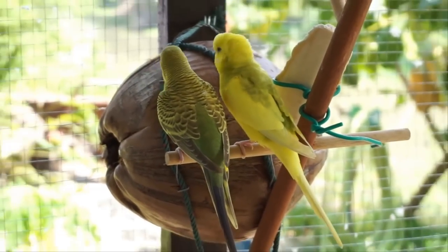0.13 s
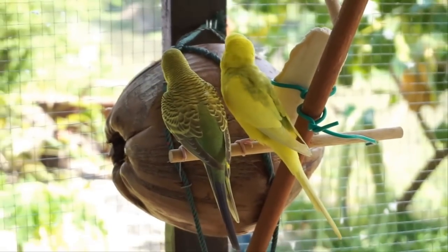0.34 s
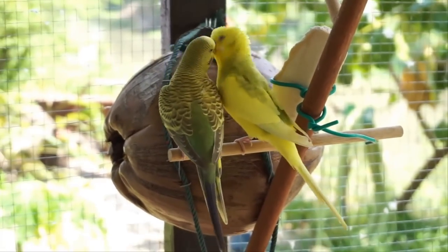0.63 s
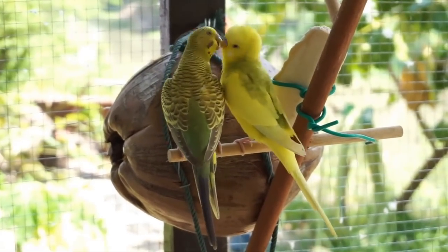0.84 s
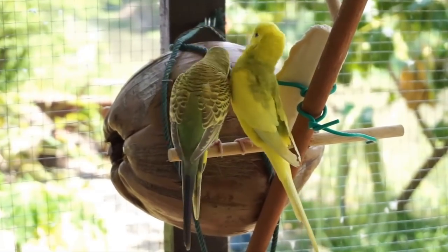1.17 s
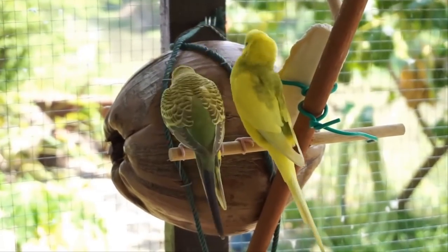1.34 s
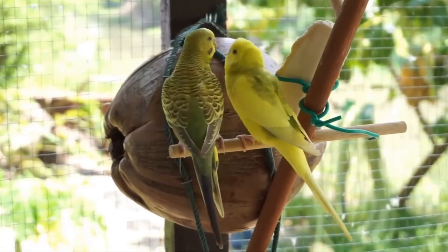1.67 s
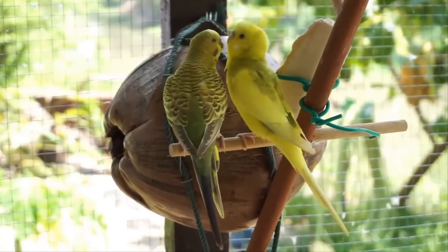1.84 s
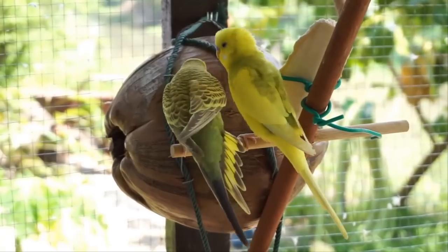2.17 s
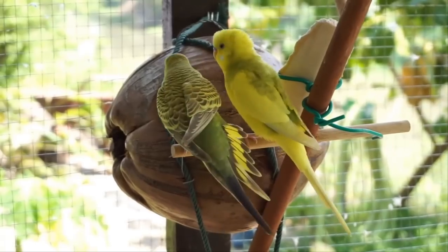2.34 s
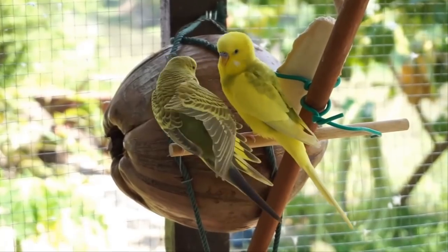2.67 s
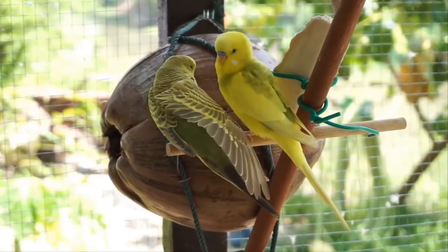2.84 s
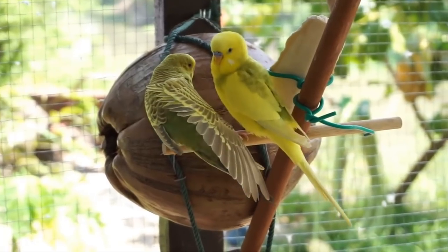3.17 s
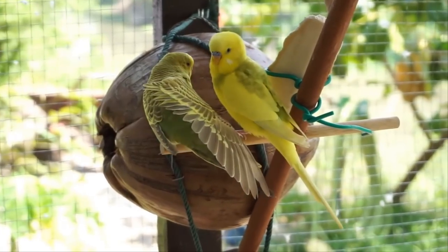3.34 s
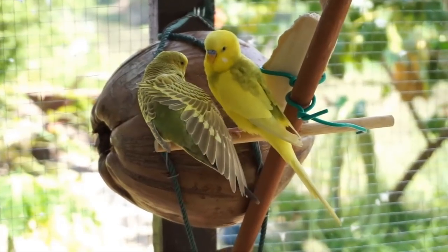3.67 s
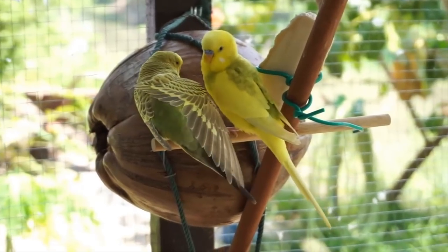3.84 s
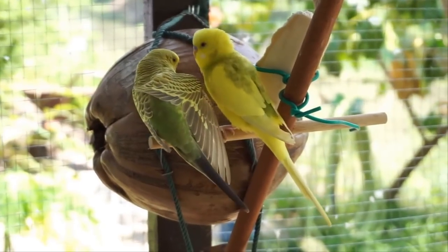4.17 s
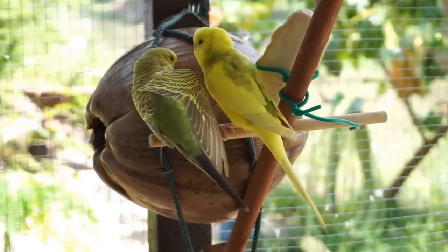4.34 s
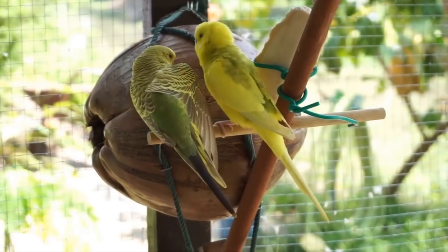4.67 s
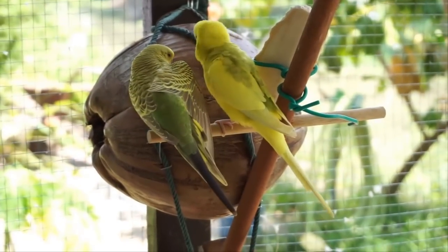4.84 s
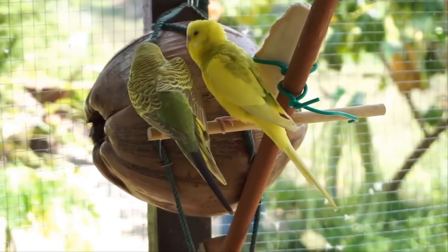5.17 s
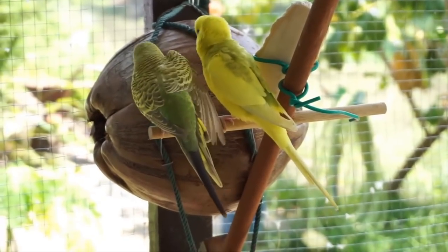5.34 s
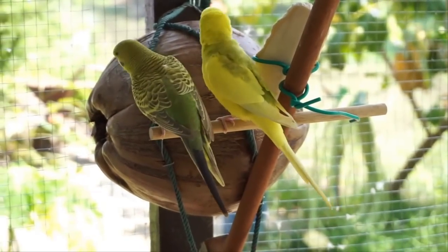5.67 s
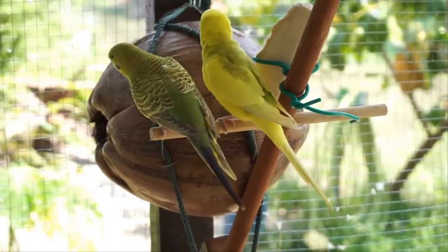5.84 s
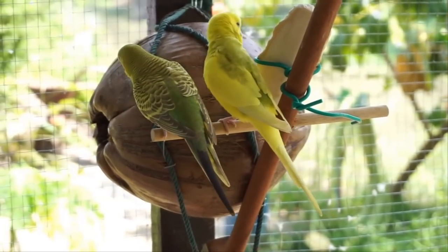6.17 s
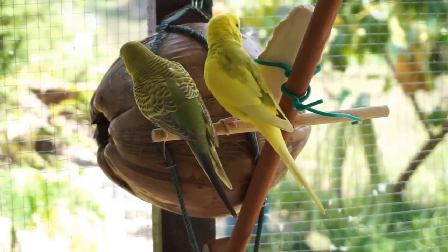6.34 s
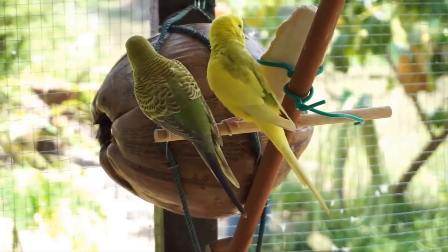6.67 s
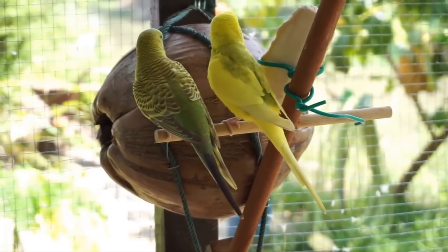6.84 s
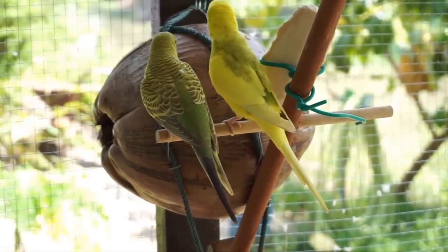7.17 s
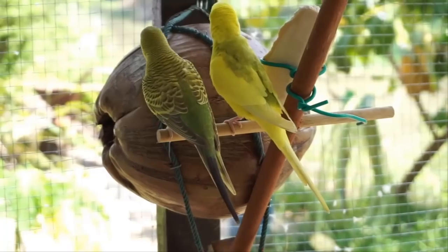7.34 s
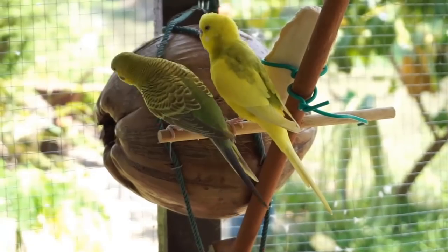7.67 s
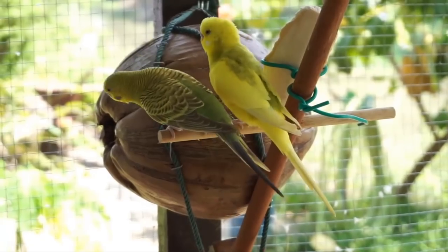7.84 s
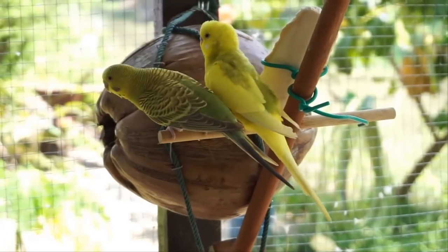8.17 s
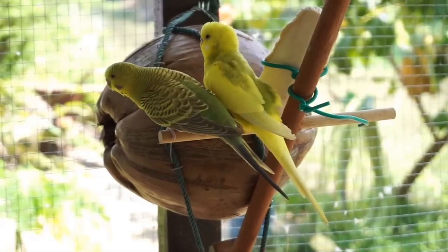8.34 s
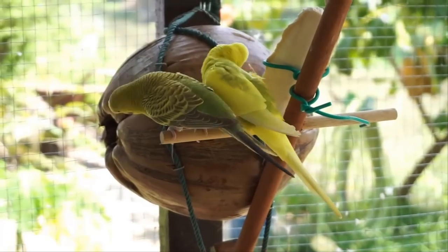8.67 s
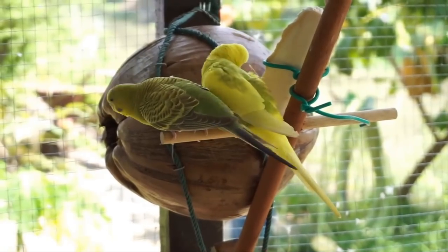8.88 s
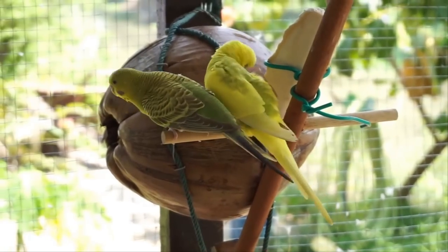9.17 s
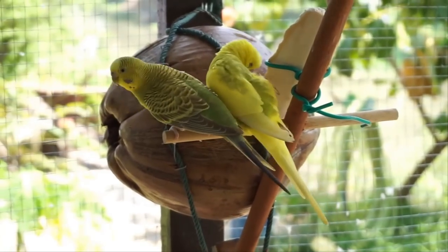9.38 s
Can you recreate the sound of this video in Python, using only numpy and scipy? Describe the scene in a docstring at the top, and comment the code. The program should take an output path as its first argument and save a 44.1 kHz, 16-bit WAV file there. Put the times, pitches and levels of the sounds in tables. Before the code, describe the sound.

In an outdoor aviary, small parrots warble continuously near the microphone and somewhat to its right, mixing quick gliding chirps, scratchy squawks and beak clicks with a slight, short echo. A faint far engine hums beneath the open air throughout. A soft low rustle passes once about two thirds through, then the flock eases a little and a faraway songbird gives five high falling chirps.

```python
"""An open aviary, where a flock of budgerigars warbles, mostly from the right. The syrinx whistles gliding
notes or vibrates roughly in squawks; squawks and tongue clicks resonate in chest, throat and beak.
Roof, posts and nest shells return short echoes. Farther birds chatter, and near the end a songbird
repeats a falling chirp. A far engine hums under outdoor air, and a low rustle passes once."""
import sys
import numpy as np
from scipy import signal
from scipy.fft import rfft, irfft, next_fast_len
from scipy.io import wavfile
from scipy.ndimage import uniform_filter1d, map_coordinates

SR = 44100
rng = np.random.default_rng(int(sys.argv[2]) if len(sys.argv) > 2 else 0)


def master_out(mix):
    """Clip the mix to full scale and print it as 16-bit PCM to the path in sys.argv[1]."""
    frames = np.transpose(np.atleast_2d(mix))
    ceiling = np.clip(frames, -1, 1)
    pcm = np.round(ceiling * 32767).astype(np.int16)
    wavfile.write(sys.argv[1], SR, pcm)


N = 419391


def amp(db):
    return 10 ** (np.asarray(db) / 20)


def unit_rms(x):
    return x / np.sqrt(np.mean(x ** 2) + 1e-20)


def log_interp(points, hz):
    """Interpolate (Hz, value) points on a log axis."""
    f, values = np.transpose(points)
    return np.interp(np.log(hz + 1), np.log(f + 1), values)


def wobble(rate_hz, size=N):
    """Smooth random curve, rate_hz knots a second."""
    knots = rng.standard_normal(int(size * rate_hz / SR) + 4)
    return map_coordinates(knots, [np.arange(size) * rate_hz / SR])


def phase_of(hz):
    return 2 * np.pi * np.cumsum(hz) / SR


def filtered(x, response):
    """Apply a complex frequency response."""
    size = next_fast_len(x.shape[-1] + 4096)
    return irfft(rfft(x, size) * response(np.fft.rfftfreq(size, 1 / SR)), size)[..., :x.shape[-1]]


def resonate(x, hz, width_hz):
    """Causal resonance, applied twice for steep skirts; unit RMS out."""
    return unit_rms(filtered(x, lambda f: (1j * f * width_hz / (hz * hz - f * f + 1j * f * width_hz)) ** 2))


def place(out, start_s, low, high=0, *, pan_db):
    """Mix in a call. The microphone body shades the low part (pan_db: left minus right), not the high."""
    left, right = low * amp([[pan_db / 2], [-pan_db / 2]]) + high
    left = np.roll(left, rng.choice([-2, -1, 0, 0, 1, 2]))  # arrival lag from the perch's angle
    span = out[:, max(round(start_s * SR), 0):][:, :len(low)]
    span += np.array([left, right])[:, :span.shape[1]]


def engine(first_db, second_db, upper_db):
    """Far engine: two unsteady firing orders and a fainter tone above them."""
    firing = phase_of(68.7 + 0.83 * wobble(2.3))
    hum = amp(first_db + 0.92 * wobble(10)) * np.sin(firing)
    hum += amp(second_db + 1.33 * wobble(7)) * np.sin(2 * firing)
    hum += amp(upper_db + 0.74 * wobble(23)) * np.sin(phase_of(217 + 1.487 * wobble(3.3)))
    return np.sqrt(2) * hum


# Air spectrum. Each row: frequency in Hz, relative density in dB.
AIR_SPECTRUM = [(25, -18), (50, -12.5), (80, -7.5), (180, -10), (230, -11), (320, -10.5), (430, -20),
                (635, -12.5), (2150, -19), (2300, -14), (2500, -18), (4800, -27), (6000, -33), (11000, -35)]
# Air coherence. Each row: frequency in Hz, left-right correlation from 0 to 1.
AIR_COHERENCE = [(60, 1), (220, 0.9), (840, 0.65), (3140, 0.064), (11800, 0.02)]
def outdoor_air():
    """Patchy noise, alike on both sides in the bass only."""
    def mid_side_gains(hz):
        angle = np.arccos(np.clip(log_interp(AIR_COHERENCE, hz), -1, 1)) / 2
        return amp(log_interp(AIR_SPECTRUM, hz)) * [np.cos(angle), np.sin(angle)]

    spectra = signal.stft(rng.standard_normal((2, N)), nperseg=512)[2]
    patches = uniform_filter1d(rng.standard_normal(spectra.shape[1:]), 6, axis=0)
    patches = uniform_filter1d(patches, 10, axis=1)
    noise = signal.istft(spectra * amp(2.04 * unit_rms(patches)), nperseg=512)[1][:, :N]
    mid, side = filtered(noise, mid_side_gains)
    return unit_rms(np.array([mid + side, mid - side]))


# Background levels. Each row: time in seconds, firing order in dB, second order in dB, air base in dB.
BACKGROUND_LEVELS = [(0, -51.5, -51, -50), (2.4, -54.5, -48.5, -49), (2.47, -56, -56.5, -55.5),
                     (3.3, -54.5, -53.5, -52), (5.4, -53, -48, -50), (7, -53, -47, -50),
                     (7.6, -53.5, -51.5, -53.5), (9.5, -55, -50.5, -51)]
def background():
    """Engine under air; its upper tone follows the air level."""
    times_s, *columns = np.transpose(BACKGROUND_LEVELS)
    first_db, second_db, air_db = (np.interp(np.arange(N) / SR, times_s, db) for db in columns)
    return engine(first_db, second_db, air_db - 7.5) + amp(air_db + 3) * outdoor_air()


def rustle(centre_s=6.97, half_width_s=0.25):
    """One lumpy swell of low noise."""
    swell = np.exp(-((np.arange(N) / SR - centre_s) / half_width_s) ** 4) * amp(3.2 * wobble(27))
    return amp(-53) * swell * resonate(rng.standard_normal(N), 440, width_hz=400)


def syrinx(length_s, glide_hz, rough_db, waver_hz):
    """Phase and envelope of a whistle fluttering in strength and pitch. glide_hz: start, middle, end."""
    progress = np.linspace(0, 1, round((length_s + 0.0051) * SR))
    hz = np.polyval(np.polyfit([0, .5, 1], glide_hz, 2), progress)
    hz += waver_hz * wobble(257.3, len(progress))
    envelope = np.sin(np.pi * progress ** 0.87) ** 0.6 * amp(rough_db * wobble(205, len(progress)))
    return phase_of(hz) + 2 * np.pi * rng.random(), unit_rms(envelope) * np.sqrt(2)


def chirp(length_s, glide_hz, rough_db, waver_hz):
    """A whistle without overtones."""
    phase, envelope = syrinx(length_s, glide_hz, rough_db, waver_hz)
    return envelope * np.sin(phase)


def far_chatter(count=130):
    """Faint notes of distant birds, densest at the start."""
    out = np.zeros((2, N))
    for when, pitch, bend, strength in rng.random((count, 4)):
        glide_hz = 950 * 4 ** (pitch ** 2) * (1 + .12 * (bend - .6) * np.array([-1, 0, 1]))
        note = chirp(.02 + .04 * bend, glide_hz, rough_db=4, waver_hz=60)
        place(out, when ** 1.6 * N / SR, amp(-60 + 6 * strength) * note, pan_db=-8)
    return out


def songbird(start_s=8.29, period_s=.207, level_db=-60):
    """A distant bird whistles five falling chirps."""
    out = np.zeros((2, N))
    for k in range(5):
        note = chirp(.07, (5950, 5550, 5150), rough_db=4, waver_hz=110)
        place(out, start_s + k * period_s, amp(level_db) * note, pan_db=-1.5)
    return out


# Far peeps. Each row: start in seconds, length in seconds, pitch in Hz, level in dB.
PEEPS = [(8.09, .15, 5800, -62), (8.143, .06, 3680, -58), (9.06, .32, 610, -58), (8.403, .06, 3690, -58),
         (8.35, .14, 5760, -65), (8.61, .08, 5700, -65), (8.88, .04, 5700, -63), (9.17, .12, 5680, -68),
         (9.344, .04, 5380, -60)]
def far_peeps():
    """Distant birds hold faint tones."""
    out = np.zeros((2, N))
    for start_s, length_s, hz, db in PEEPS:
        note = chirp(length_s, (hz, hz, hz), rough_db=4, waver_hz=30)
        place(out, start_s, amp(db) * note, pan_db=-1.5)
    return out


def vocal_tract(source, length_samples, db, throat_hz, beak_hz, chest_db, beak_db, sizzle_db):
    """Low part (throat, chest) and high part (beak, sizzle); band levels are relative to the throat."""
    gain = amp(db) * np.sqrt(len(source) / length_samples)  # sets RMS over length_samples
    low = resonate(source, throat_hz, 1630) + amp(chest_db) * resonate(source, 1880, 870)
    high = amp(beak_db) * resonate(source, beak_hz, 5000) - amp(sizzle_db) * resonate(source, 8950, 3350)
    return gain * low, gain * high


# Tongue clicks. Each row: start in seconds, level in dB, throat in Hz, beak in relative dB.
CLICKS = [(0.16, -34.5, 3130, 1.5), (0.745, -44.5, 3230, 9.5), (0.796, -34, 3300, -10),
          (1.237, -37.5, 3480, -43), (1.762, -37, 2800, 1), (2.057, -43.5, 2300, 5),
          (2.098, -43.5, 3570, -1.5), (2.144, -51, 2250, -1), (2.203, -38, 2760, 2),
          (2.325, -47, 2620, 7.5), (2.338, -50, 2650.0, 16), (2.679, -37, 2790, -3),
          (3.463, -60, 1880.0, 6), (3.741, -41, 2760, -14), (4.044, -35, 3400, 0.5),
          (4.888, -40.5, 2920, 3), (5.14, -63, 4300, 14), (5.659, -56, 2200.0, 0),
          (5.901, -38.5, 3020, 5.5), (5.976, -40.5, 2800, -13), (6.207, -47, 1870, -26),
          (6.301, -36, 3370, -6), (6.346, -31, 3280, -18), (6.432, -37, 2280, -42), (6.476, -36, 3750, -37),
          (6.554, -50, 3500, -32), (7.455, -47, 3360, -37.0), (8.522, -42.5, 2740, -42),
          (8.648, -55, 3260, -22.0), (8.95, -50.5, 2670.0, -32)]
def tongue_clicks(attack_s=.0035, t60_s=.045):
    """Brief noise bursts through the tract; sizzle grows with the beak level."""
    out = np.zeros((2, N))
    t = np.arange(round(0.031 * SR)) / SR
    envelope = np.clip(t / attack_s, 0, 1) * amp(-60 * t / t60_s)
    for start_s, db, throat_hz, beak_db in CLICKS:
        burst = envelope * rng.standard_normal(len(t))
        low, high = vocal_tract(burst, len(t), db, throat_hz, beak_hz=4520, chest_db=-15,
                                beak_db=beak_db, sizzle_db=-34 + 0.59 * beak_db)
        place(out, start_s - .0015, low, high, pan_db=rng.normal(-4.5, 2.9))
    return out


# Squawks. Each row: start in seconds, length in seconds, level in dB, throat in Hz,
# then chest, beak and sizzle in relative dB.
SQUAWKS = [(0.0, 0.058, -34.5, 3080, -21, -46, -10), (0.29, 0.027, -38.5, 2960, -34, 1.5, -9),
           (0.604, 0.058, -30.5, 2957, -32, 10.5, -18), (0.861, 0.068, -37, 2664, -7, 0.5, -31),
           (0.907, 0.057, -38, 3000, -10, -36, -37.0), (1.017, 0.033, -40.5, 2950, -5, -2, -22.0),
           (1.035, 0.034, -33.5, 2860.0, -16, -1.5, -31.0), (1.366, 0.05, -30.5, 3205, -15, 15, -1),
           (1.409, 0.052, -35.5, 2833, -40, 14.5, -14), (1.597, 0.038, -26, 3047, -50, 1, -29),
           (1.927, 0.012, -63.5, 4310, 4, 29, 1), (2.415, 0.049, -30, 3155, -57, 14, -18),
           (2.488, 0.017, -42.5, 2780, -38, 19, 5), (2.835, 0.063, -43, 2206, -21, -7, -16),
           (3.116, 0.028, -46, 3010, -35.0, -32.0, -3.5), (3.616, 0.049, -37.5, 2100, -5, -8.5, -18),
           (3.988, 0.041, -48, 2224, -12, -27, -13), (4.14, 0.048, -43.5, 2940, -9, -27.0, -13),
           (4.268, 0.034, -32, 2897, -26, 16, -17), (4.496, 0.031, -37, 3216, -6, -5, -35),
           (4.551, 0.041, -32.5, 3010, -11.5, 10, -24), (4.6, 0.034, -31.5, 3200, -17, 3, -34),
           (4.972, 0.023, -48.5, 2930.0, -26, -2.5, -38.0), (5.151, 0.073, -43, 3420, -17, -28, -10),
           (5.335, 0.01, -42, 2504, -33, -6.5, -27), (5.458, 0.047, -31, 2930, -41, 7, -25),
           (5.511, 0.039, -39, 2940, -32, 8.5, -29), (6.668, 0.013, -45, 3010, -31, -24, -29),
           (6.718, 0.029, -29.5, 3220, -35, 5.5, -16), (6.769, 0.028, -36.5, 3780, -34.0, -17, -3),
           (6.855, 0.052, -29.5, 2802, -35, 7.5, 2.5), (6.97, 0.044, -33, 3020, -26, 8.5, 6),
           (7.076, 0.017, -38.5, 2070, -22, -29, 0.5), (7.109, 0.073, -30.5, 2566, -12, -20, -21),
           (7.246, 0.043, -25.5, 3567, -13.5, -22, -6.5), (7.305, 0.014, -38, 3570.0, -45.0, -20, -33.0),
           (7.527, 0.034, -30, 3374, -46, 6, -29), (7.577, 0.023, -38, 3550, -48.0, -12, -35.0),
           (7.849, 0.015, -38, 2800, -16, -44, -43), (7.959, 0.056, -53, 2550.0, 1.5, -16, -3),
           (8.02, 0.0075, -41, 3120, -35, -34, -27), (8.557, 0.12, -52.5, 2665, -24, -25.0, -27.0),
           (8.758, 0.024, -41.5, 2295, -28, 3, -26), (8.803, 0.037, -65, 3360, -10.0, 11, 8),
           (8.961, 0.083, -52.5, 3030, -28, -45.0, -34), (9.1, 0.015, -48, 3514, -29, -21, -36.0),
           (9.268, 0.024, -40.5, 2633, -8.5, -16, -41)]
def squawks(attack_s=0.015, release_db_per_s=590, pulse_hz=187.8, pulse_depth=0.2):
    """The syrinx vibrates roughly: a wavering, climbing tone and crackle, beaten into quick pulses."""
    out = np.zeros((2, N))
    for start_s, length_s, db, throat_hz, chest_db, beak_db, sizzle_db in SQUAWKS:
        size = round((length_s + .03) * SR)
        t = np.arange(size) / SR
        progress = t / length_s
        fade_db = -2.5 * progress - release_db_per_s * np.clip(t - length_s, 0, 1)
        envelope = np.clip(t / attack_s, 0, 1) ** 0.81 * amp(fade_db)
        pulse_phase = phase_of(pulse_hz * (1 + .25 * wobble(57, size)))
        envelope *= amp(1.5 * wobble(330, size)) * (1 + pulse_depth * np.sin(pulse_phase))
        climb = 1 + 0.0903 * np.clip(2 * progress - 1, -1, 1)
        phase = phase_of(throat_hz * (climb + .11 * wobble(420, size)))
        voice = .4 * np.sin(phase) + .4 * np.sin(2 * phase) + .3 * np.sin(3 * phase)
        crackle = unit_rms(rng.standard_normal(size) * amp(3.5 * wobble(900, size)))
        beak_hz = 4910 + 33 * beak_db  # a wider beak is louder and rings higher
        low, high = vocal_tract(envelope * (voice + crackle), length_s * SR, db, throat_hz, beak_hz,
                                chest_db, beak_db, sizzle_db)
        high *= amp(-4.5 - 3 * progress)
        place(out, start_s - .001, low, high, pan_db=rng.normal(-5, 4))
    return out


# Whistled notes. Each row: start in seconds, length in seconds, start pitch in Hz, end pitch in Hz,
# level in dB, overtone base in relative dB.
WHISTLES = [(0.0, 0.0091, 2860, 3070, -26, -26), (0.042, 0.021, 2810, 3830, -24.5, -29),
            (0.053, 0.064, 2230, 2403, -34, -3.5), (0.054, 0.013, 3480, 3190, -22, -39),
            (0.227, 0.012, 3360, 2380, -41.5, -30.0), (0.249, 0.029, 2880, 2836, -32, -22),
            (0.279, 0.0097, 1840, 1845, -36.5, -5), (0.28, 0.013, 3520, 3450, -31.5, -13),
            (0.307, 0.013, 2418, 1630, -36, -22), (0.315, 0.058, 1700, 2230, -39, -5),
            (0.319, 0.029, 3170, 3150, -27, -9), (0.36, 0.018, 2500, 2400, -32, 2.5),
            (0.374, 0.023, 2376, 2673, -31.5, 2), (0.393, 0.014, 2710, 2320, -37, -6),
            (0.411, 0.02, 3310, 3110, -26.5, -17), (0.442, 0.041, 2900, 2670, -41.5, -13),
            (0.481, 0.016, 3900, 3050, -30, -27.5), (0.523, 0.0067, 3640, 2150, -39, -14),
            (0.524, 0.02, 2140, 2010, -42, -36.0), (0.556, 0.014, 1904, 2315, -40, 0),
            (0.575, 0.013, 2460, 2840, -39, -8), (0.815, 0.019, 3050, 2950, -28.5, -24),
            (0.865, 0.018, 658, 700, -45, 5), (0.903, 0.009, 3160, 3570, -28, -25),
            (0.904, 0.013, 2140, 1990, -33, 1), (0.918, 0.022, 1450, 1405, -38.5, 10),
            (0.921, 0.0089, 2930, 2990, -29, -25), (0.939, 0.0086, 2210, 2090, -33.5, 5),
            (0.957, 0.0065, 2040, 2660, -41, 2), (1.046, 0.015, 4900, 5300, -24, -40.0),
            (1.052, 0.05, 2620, 3010, -27, -3), (1.055, 0.021, 5700, 5740.0, -31, -39),
            (1.096, 0.029, 3050, 3180, -32, -27), (1.129, 0.042, 2690, 2410, -37, -4),
            (1.134, 0.064, 3880, 3810, -43, -21), (1.255, 0.019, 3390, 3050, -37, -17),
            (1.252, 0.057, 1750, 1444, -44, -1), (1.343, 0.044, 2520, 2310, -36, -6),
            (1.44, 0.046, 2390, 3070, -32, -17), (1.496, 0.015, 3580, 2980, -34, -13),
            (1.518, 0.016, 3700, 3060, -34.5, -15), (1.535, 0.094, 3020, 2630, -33.5, -9),
            (1.554, 0.039, 2560, 2522, -27.5, 3), (1.588, 0.011, 3760, 3830, -19, -13),
            (1.636, 0.023, 4820, 4910, -22, -39), (1.643, 0.028, 2337, 2490, -30, 8.5),
            (1.889, 0.018, 2200, 1930, -47, -26), (1.89, 0.034, 970, 1050, -49, -12),
            (1.904, 0.025, 1924, 2140, -45.5, -26), (1.927, 0.0058, 5480, 5040, -27, -33),
            (1.937, 0.019, 5270, 5630, -29, -26), (1.993, 0.033, 873, 1214, -52, 7),
            (2.288, 0.015, 2310, 2940, -42.5, -13), (2.311, 0.046, 2300, 2710, -33.5, -9),
            (2.356, 0.0085, 3300, 3050, -28, -34.0), (2.371, 0.023, 2350, 2434, -28, -10),
            (2.379, 0.016, 2930, 3530, -26.5, -40), (2.393, 0.024, 2820, 2800, -19, -18),
            (2.412, 0.0081, 3117, 3016, -21, -37), (2.437, 0.023, 3030, 3180, -37, 16),
            (2.475, 0.015, 3550, 3620, -30.5, -21), (2.485, 0.053, 2430, 2500, -33.5, -17),
            (2.552, 0.056, 2060, 2570, -36.5, -6), (2.853, 0.039, 2238, 2400, -47, 8),
            (2.978, 0.011, 2270, 2180, -42.5, -29.0), (3, 0.0079, 2900, 3060, -33, -27),
            (3.015, 0.029, 2225, 2490, -37, -22), (3.036, 0.018, 2790, 2966, -30, -25),
            (3.057, 0.023, 2770, 3150, -33, -25), (3.078, 0.018, 2810, 2350, -35, -14),
            (3.096, 0.02, 4000, 3940, -34.5, -2), (3.111, 0.017, 3500, 2295, -33, -34),
            (3.119, 0.018, 2020, 2030, -40, -30), (3.128, 0.015, 2210, 3350, -30.5, -33),
            (3.116, 0.033, 4100, 4240, -41, -21), (3.135, 0.0174, 3250, 3710, -30, -38),
            (3.152, 0.021, 3640, 3840, -35, -5), (3.198, 0.054, 2014, 2860, -33.5, -22),
            (3.203, 0.028, 2332, 2586, -33.5, -18), (3.264, 0.048, 2370, 2773, -32, -15),
            (3.323, 0.016, 4260, 2060, -48.5, -30), (3.368, 0.032, 2140, 2100, -44, -33.0),
            (3.656, 0.039, 3450, 2710, -39.5, -4), (3.705, 0.05, 2393, 2580, -36.5, 2),
            (3.749, 0.047, 2670, 2830, -44, -30), (3.815, 0.0081, 3600, 2680, -33.5, -12),
            (3.824, 0.011, 2220, 2020, -40.5, -3), (3.85, 0.02, 2960, 2790, -35, -21),
            (3.882, 0.0082, 2220, 2370, -40.5, -28.0), (4.105, 0.03, 3000, 3230, -42, -10),
            (4.162, 0.0093, 4000, 3700, -40, -1), (4.165, 0.021, 3440, 2760, -38, -36),
            (4.187, 0.016, 2600, 2510, -36.0, -22.0), (4.204, 0.013, 3540, 2600, -30.5, -30.0),
            (4.216, 0.025, 2190, 1880, -41, -6), (4.241, 0.026, 2680, 2060, -39, -12),
            (4.258, 0.015, 3700, 3150, -28.5, -17), (4.419, 0.0074, 2300, 1940, -38.5, -10),
            (4.438, 0.013, 1830, 3180, -38, -15), (4.457, 0.039, 2480, 2750, -39, -7.5),
            (4.656, 0.031, 2380, 2710, -30.5, -15), (4.705, 0.017, 3540, 3470, -35.5, -9),
            (4.708, 0.028, 3230, 2420.0, -35.5, -23), (4.729, 0.03, 2980, 2580, -31.5, -19),
            (4.75, 0.045, 3560, 3380, -37, -16), (4.752, 0.019, 1725, 1824, -37.5, 1),
            (4.779, 0.017, 2150, 1700, -37, -16), (4.787, 0.041, 2085, 2250, -34.5, -24),
            (4.914, 0.028, 3100, 2610, -39.5, -34), (4.979, 0.014, 3780, 3700, -40, -30),
            (4.993, 0.014, 3340, 3046, -30, -39), (4.994, 0.015, 2990, 1860, -34, -22),
            (5.019, 0.053, 1870, 2410, -42, -30), (5.082, 0.059, 1320, 1570, -53.5, -25),
            (5.19, 0.016, 980, 970, -52, -20), (5.23, 0.034, 1024, 1266, -48, -18),
            (5.262, 0.036, 1247, 1060, -52, -20), (5.152, 0.0093, 5130, 4020, -36, -35.0),
            (5.164, 0.012, 3540, 3550, -30.5, -7), (5.168, 0.027, 2350, 1810, -37, -4),
            (5.179, 0.032, 3920, 2470, -32.5, -36), (5.305, 0.039, 1480, 1476, -44, -15),
            (5.333, 0.036, 2155, 2010, -36, -36.0), (5.365, 0.0045, 2800, 2670, -28.5, -36.0),
            (5.388, 0.065, 1150, 1100, -50, -20), (5.522, 0.0092, 3110, 2340, -31, -20),
            (5.541, 0.014, 2980, 3280, -33, 0), (5.661, 0.0046, 2290, 2110, -39.5, -37.0),
            (5.681, 0.013, 3040, 2700, -36.5, -35), (5.975, 0.031, 2120, 2020, -44.5, -3),
            (6.019, 0.018, 2317, 2390, -42, -10), (6.035, 0.012, 2330, 2495, -41.5, -13),
            (6.077, 0.036, 2186, 2530, -39, -30), (6.103, 0.011, 2700, 2760, -41.5, -33.0),
            (6.434, 0.012, 1950, 1760, -39, -20), (6.556, 0.013, 3360, 3530, -34.5, -41),
            (6.579, 0.0047, 3440, 3060, -40, -32.0), (6.611, 0.012, 2380, 2080, -38, -38.0),
            (6.643, 0.032, 2590, 2310, -44.5, -19), (6.779, 0.018, 3780, 3750, -27, -16),
            (6.878, 0.025, 2720, 2990, -31.5, -4), (6.912, 0.014, 3680, 3540, -27.5, -8),
            (7.081, 0.059, 1860, 1850, -35, 3), (7.123, 0.023, 2580, 2510, -35, -37.0),
            (7.167, 0.027, 3010, 2700, -34, -35.0), (7.181, 0.017, 2720, 2640, -32, -6),
            (7.272, 0.058, 3760, 3810, -34.5, -15), (7.315, 0.02, 3100, 2980, -29.5, -42),
            (7.313, 0.0046, 3930, 3780, -30, -25), (7.397, 0.015, 2250, 3150, -52, -25),
            (7.411, 0.0095, 3280, 2815, -39, -21), (7.449, 0.024, 2240, 2430, -49, -23),
            (7.455, 0.023, 3850, 3490, -27.5, -20), (7.481, 0.021, 3230, 2550, -33.5, -21),
            (7.512, 0.034, 2820, 2360, -36.5, -39), (7.852, 0.018, 808, 827, -42.5, 7),
            (7.865, 0.015, 2800, 2450, -37, -18), (7.888, 0.023, 3670, 3440, -41, -22),
            (7.933, 0.018, 1550, 1535, -50, 2), (7.961, 0.018, 2190, 2760, -37.5, -36.0),
            (8.017, 0.019, 3340, 3060, -32.5, -35.0), (8.044, 0.025, 2570, 2560, -38, -24),
            (8.62, 0.0092, 1960, 3240, -42, -33), (8.644, 0.026, 1750, 1630, -48.5, -20.0),
            (8.81, 0.023, 1660, 1750, -49, -30.0), (8.811, 0.0065, 3340, 3470, -32, -26),
            (8.962, 0.046, 2144, 2960, -43.5, -30), (9.005, 0.033, 1810, 1980, -52, -17),
            (9.027, 0.035, 3480, 3730, -43, -26), (9.054, 0.011, 2620, 2780, -41, -31.0),
            (9.065, 0.048, 2260, 2400, -42.5, -12), (9.105, 0.0088, 3335, 3750, -27, -24.5),
            (9.32, 0.01, 2880, 2554, -33, -35), (9.34, 0.008, 3600, 3220, -38.5, -33.0),
            (9.344, 0.014, 2860, 2540, -34, -28), (9.427, 0.022, 1480, 1600, -51, -20.0),
            (9.454, 0.032, 2240, 1950, -43.5, -23.0), (9.486, 0.015, 3240, 3380, -34.5, -34.0)]
def warble(glide_done_halfway=.62):
    """The syrinx whistles gliding tones with fluttering overtones; breath hiss grows with the overtones."""
    out, breath = np.zeros((2, N)), np.zeros((2, N))
    for start_s, length_s, start_hz, end_hz, db, overtone_db in WHISTLES:
        onset_s = start_s - .0015
        glide_hz = start_hz, start_hz + glide_done_halfway * (end_hz - start_hz), end_hz
        phase, envelope = syrinx(length_s, glide_hz, rough_db=3.5, waver_hz=60)
        envelope *= amp(db)
        size = len(phase)
        flutter = np.sqrt(np.hanning(size)) * amp(3 * wobble(400, size))
        overtones = sum(amp(overtone_db + trim_db) * np.sin(k * phase)
                        for k, trim_db in ((2, -6), (3, -9), (4, -16)))
        raspy_tone = (1 + .4 * wobble(700, size)) * np.sin(phase)
        pan_db = rng.normal(-6.5, 2.7)
        place(out, onset_s, envelope * raspy_tone, envelope * flutter * overtones, pan_db=pan_db)
        place(breath, onset_s, amp(-24 + .2 * overtone_db) * envelope, pan_db=-3)
    hiss = resonate(rng.standard_normal((2, N)) + rng.standard_normal(N), 4500, width_hz=7800)
    return out + breath * hiss


def flock_mutter(count=150):
    """The rest of the flock joins random notes of the warble with short, scratchy flicks."""
    out = np.zeros((2, N))
    for pick, delay, depth, bend, duration in rng.random((count, 5)):
        start_s, _, _, end_hz, db, _ = WHISTLES[int(pick * len(WHISTLES))]
        centre_hz = np.clip(end_hz * (1.25 - .5 * depth), 1700, 3500)
        glide_hz = centre_hz * (1 + .12 * (bend - .7) * np.array([-1, .2, 1]))  # mostly falling
        flick = chirp(.005 + .012 * duration, glide_hz, rough_db=6, waver_hz=170)
        place(out, start_s + 0.05 * (delay - .5), amp(0.5 * db - 24) * flick, pan_db=-5.5)
    return out


def aviary_echoes(birds, predelay_samples=150):
    """Short diffuse echoes from roof, posts and nest shells, duller as they die."""
    hz, t, spectra = signal.stft(rng.standard_normal((2, SR // 4)), SR, nperseg=128)
    t60_s = log_interp([(1000, .12), (4000, .1), (10000, .08)], hz)
    tail = signal.istft(spectra * amp(-60 * t / t60_s[:, None]), SR, nperseg=128)[1]
    delayed = np.pad(birds, ((0, 0), (predelay_samples, 0)))
    return signal.fftconvolve(delayed, tail / np.linalg.norm(tail[0]), axes=1)[:, :N]


# Microphone port phase. Each row: frequency in Hz, lead of the right port in radians.
PORT_LEAD = [(2400, .4), (3400, 1.4), (4800, 1.1), (5300, 1.7), (6800, 1.7), (7500, 4.9), (10300, 5.2)]
def microphone_ports(birds):
    """Direct sound leads in phase at the right port."""
    return filtered(birds, lambda hz: np.exp(1j * log_interp(PORT_LEAD, hz) * np.array([[-.5], [.5]])))


def scene():
    """Birds and their echoes over engine, air and rustle."""
    birds = warble() + squawks() + tongue_clicks() + flock_mutter()
    birds += songbird() + far_peeps() + far_chatter()
    return microphone_ports(birds) + amp(-9) * aviary_echoes(birds) + background() + rustle()


def record(dry):
    """The input stage rounds off the loudest peaks; the treble falls steeply above the band limit."""
    ceiling, limit_hz, stop_hz = .62, 11050, 12355

    def band_limit(hz):
        skirt = amp(-27 - .02 * np.abs(hz - limit_hz))
        return np.where(hz < limit_hz, 1, skirt) * (hz < stop_hz)

    rounded = dry / (1 + np.abs(dry / ceiling) ** 4) ** .25
    return filtered(rounded, band_limit)


dry = scene()
out = record(dry)
master_out(out)
```